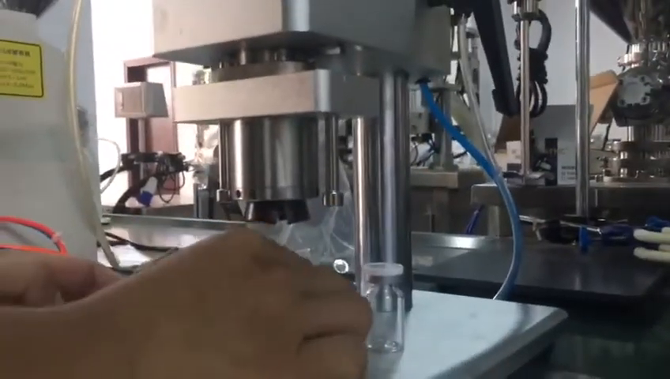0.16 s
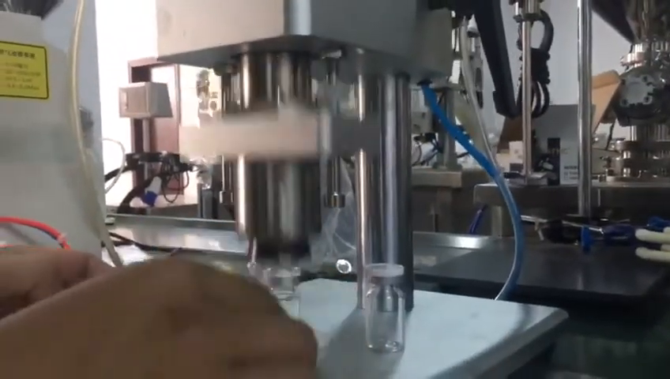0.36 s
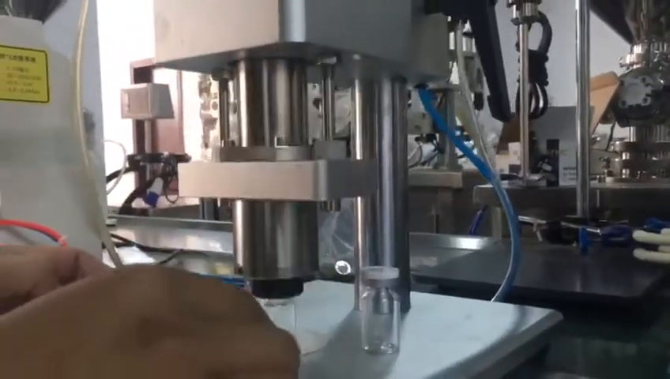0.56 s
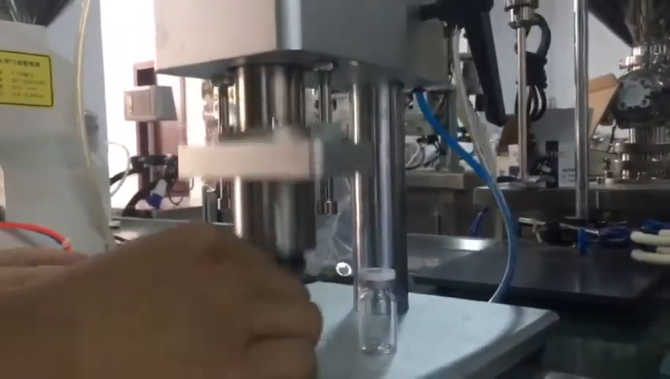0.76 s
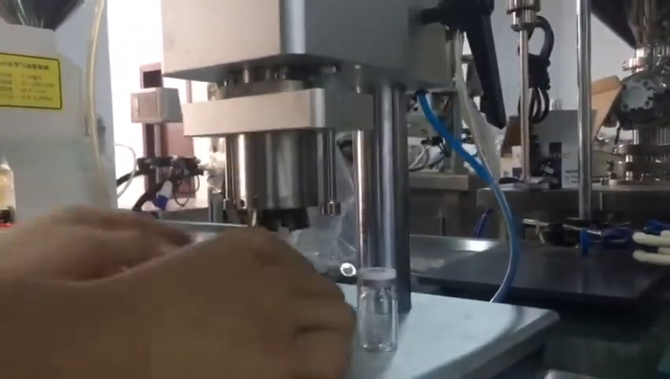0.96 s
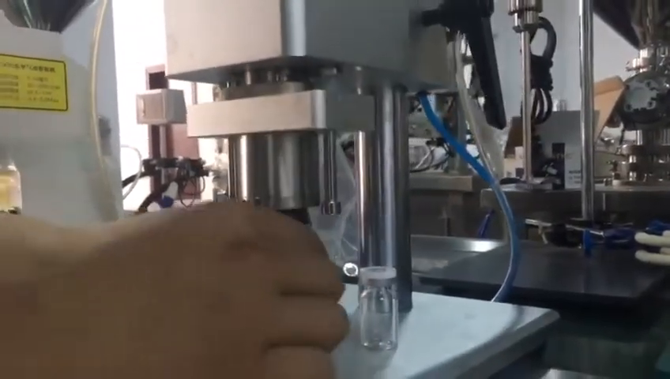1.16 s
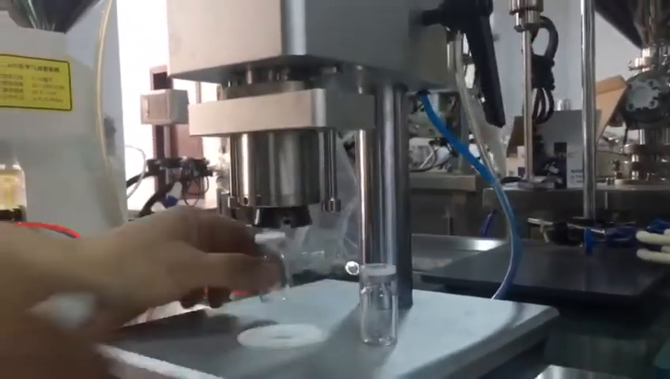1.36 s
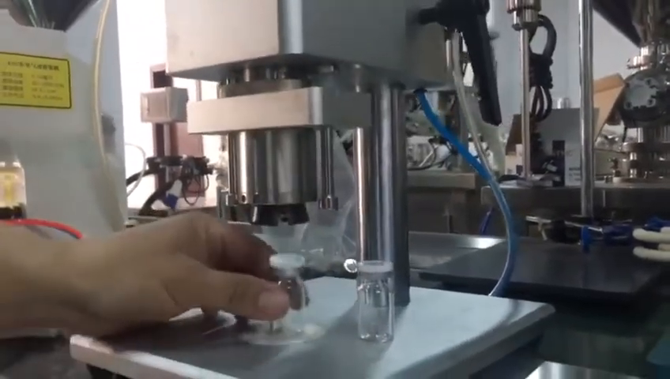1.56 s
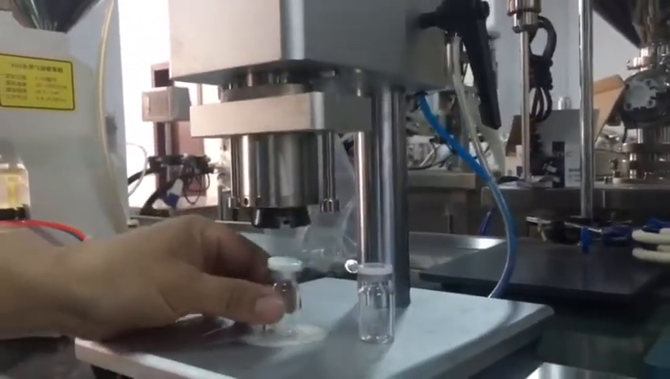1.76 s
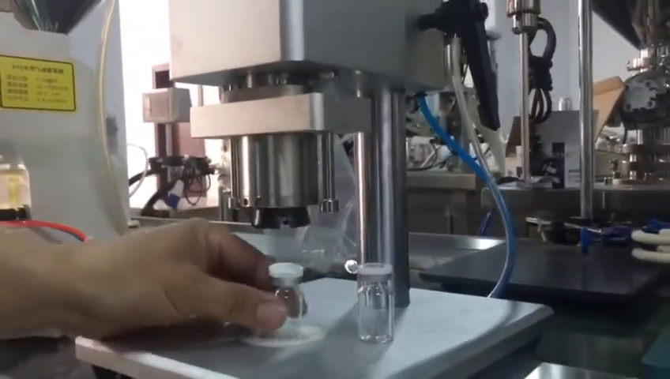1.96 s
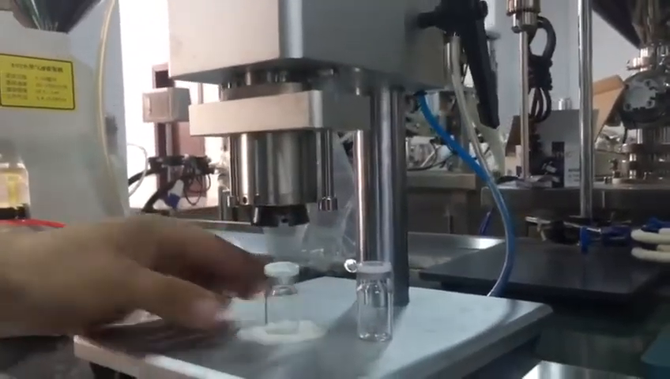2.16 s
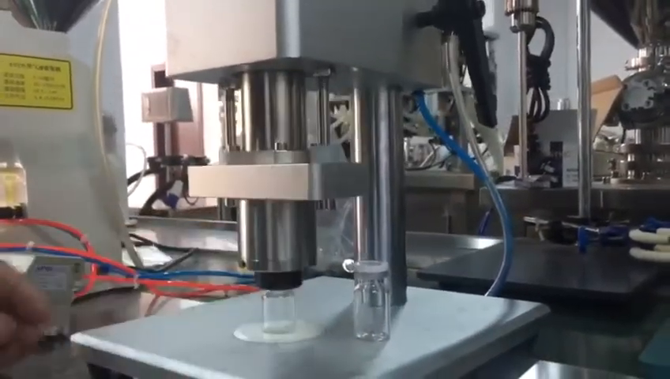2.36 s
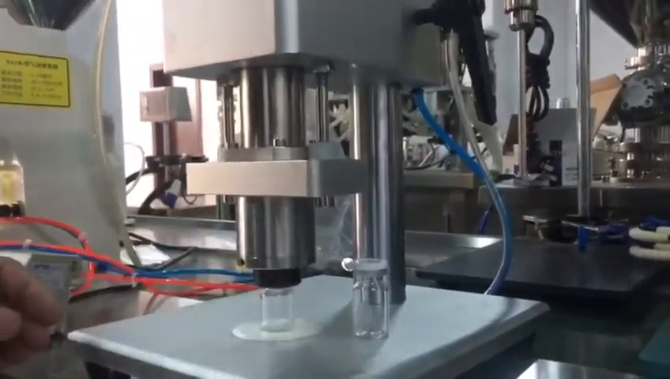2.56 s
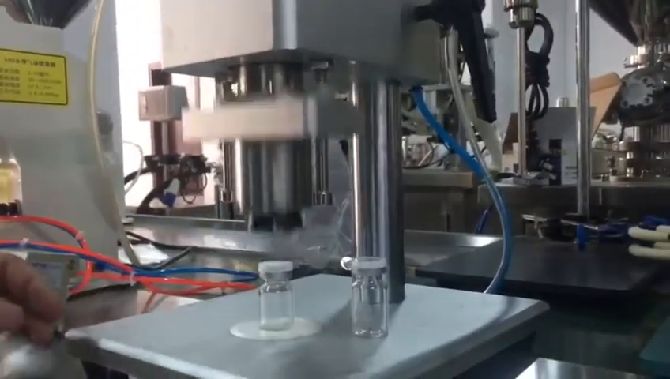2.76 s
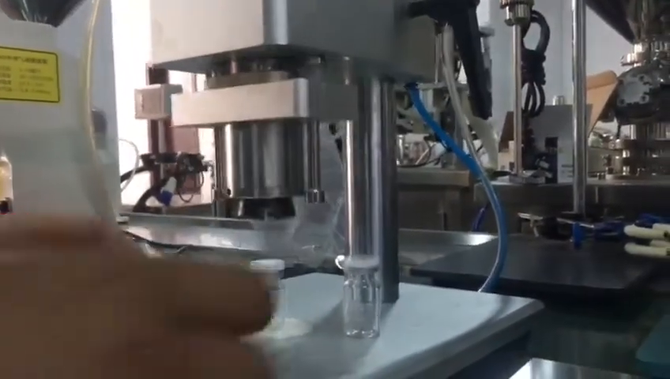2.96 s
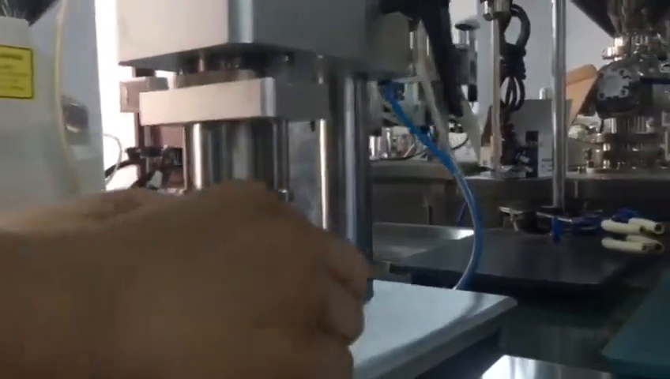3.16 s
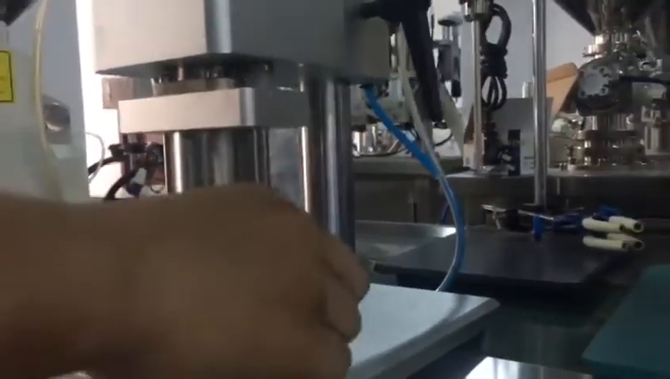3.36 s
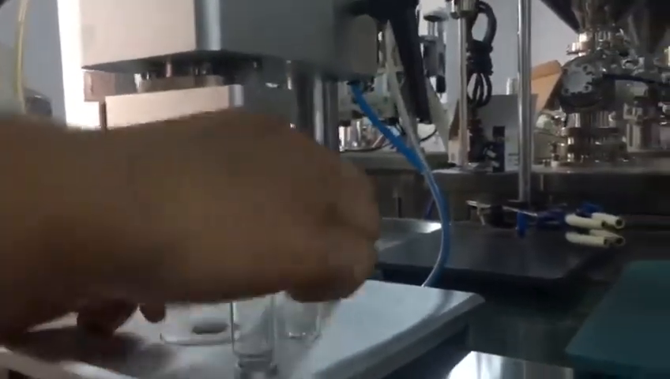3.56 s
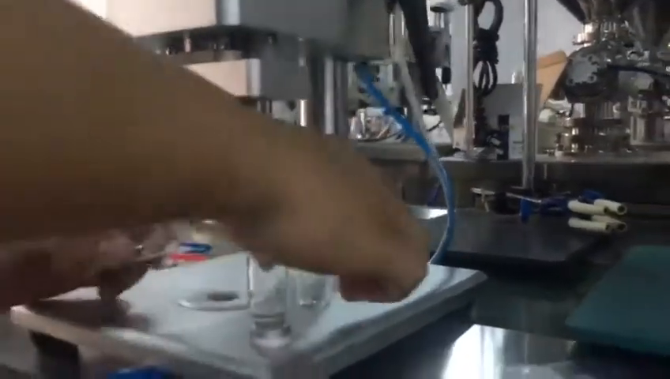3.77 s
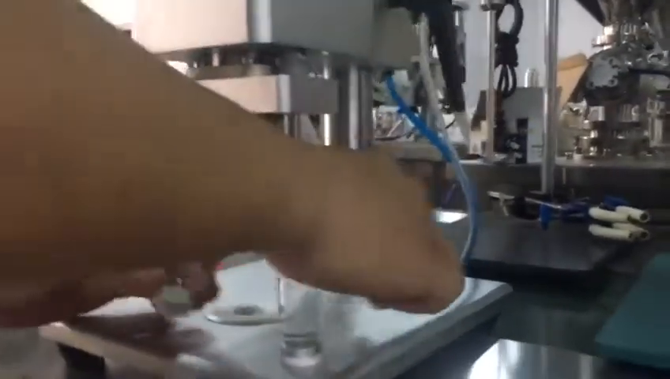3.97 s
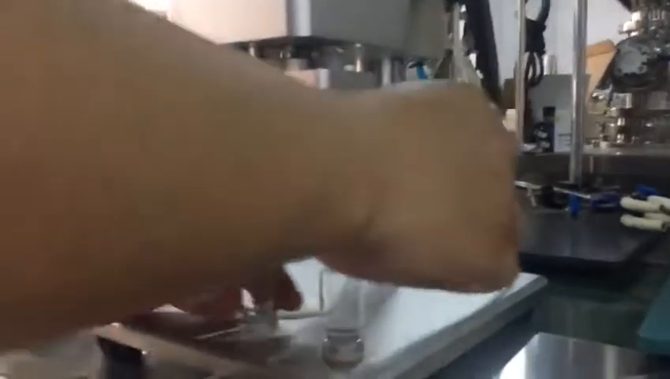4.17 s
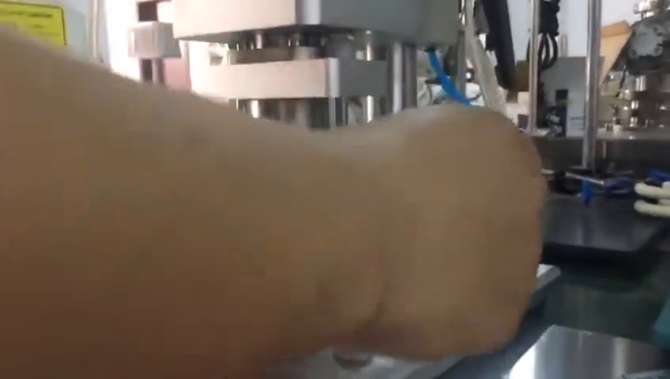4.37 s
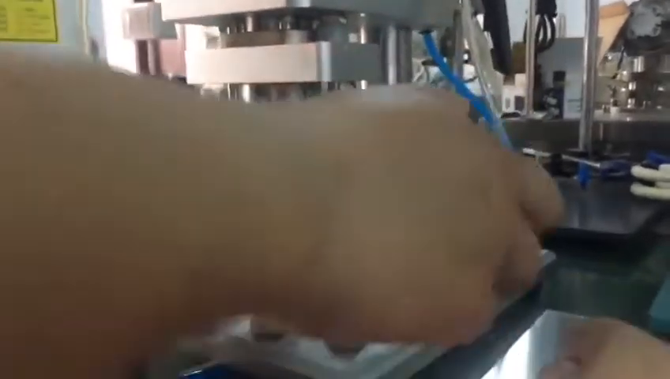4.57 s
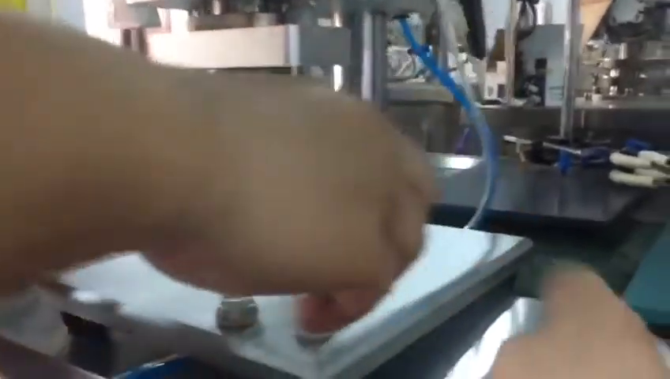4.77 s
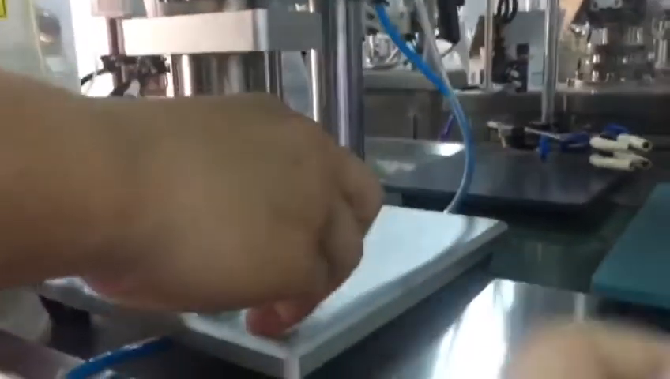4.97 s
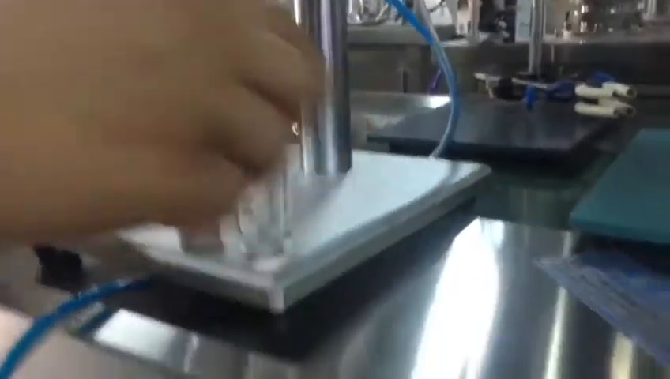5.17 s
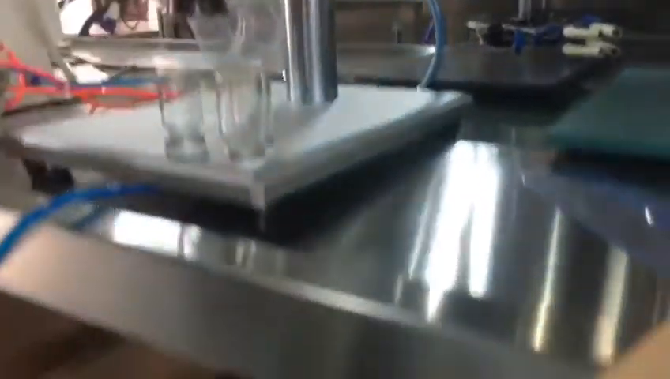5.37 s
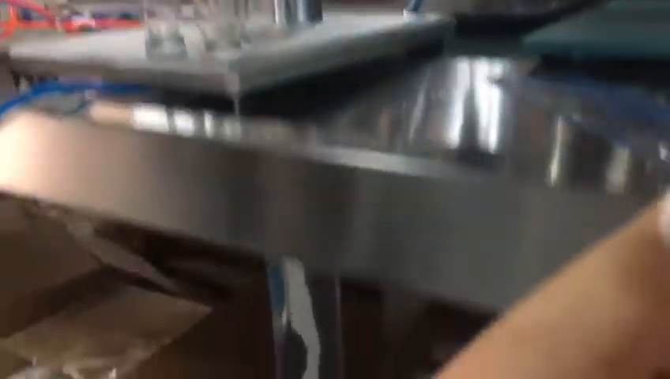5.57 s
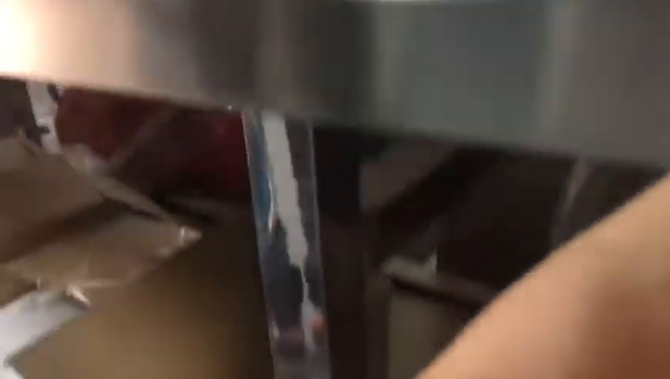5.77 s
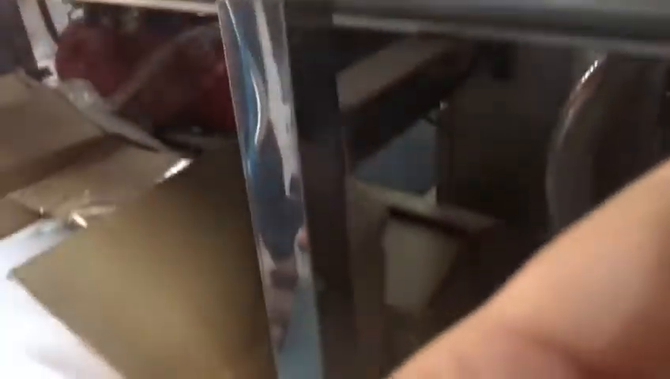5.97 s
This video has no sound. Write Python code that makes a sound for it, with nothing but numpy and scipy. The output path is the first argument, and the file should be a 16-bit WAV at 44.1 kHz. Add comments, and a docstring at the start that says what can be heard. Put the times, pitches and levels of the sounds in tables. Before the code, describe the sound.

Two double bursts of air and metallic clunks from a small pneumatic crimper, with glass vials tapping over a faint workshop hiss.

```python
"""A bench-top pneumatic crimper caps glass vials in a workshop, close to a hand-held camera's microphone.
Twice a switch clicks, a valve snaps, air rushes out of the exhaust and the head slams down, ringing the
frame; it returns with another snap, rush and blow, the jaws clacking open on the way. Vials tap on the
base plate between cycles. An air fitting leaks throughout, over room rumble and a far motor.
At the end the camera swings away and the hand rubs and bumps on its case."""
import sys
import numpy as np
from scipy import signal
from scipy.fft import rfft, irfft
from scipy.io import wavfile

SR = 44100
rng = np.random.default_rng(int(sys.argv[2]) if len(sys.argv) > 2 else 0)


def master(y):
    """Save y as 16-bit WAV."""
    cut = np.clip(np.atleast_2d(y).T, -1, 1)
    pcm = np.round(cut * 32767)  # scale
    wavfile.write(sys.argv[1], SR, pcm.astype(np.int16))


N = 265834
T = np.arange(N) / SR
# crimping cycles: (switch clicks [s], valve opens downward [s], valve opens upward [s], jaw clack [dB])
CYCLES = [(0.3394, 0.3689, .7155, -19.5), (2.2603, 2.297, 2.6585, -12.5)]
DOWN_OPENS, UP_OPENS = [row[1] for row in CYCLES], [row[2] for row in CYCLES]
DOWN_TRAVEL_S, UP_TRAVEL_S = .1333, .1836  # the piston is slower on the way up


def amp(db):
    """Decibels to gain."""
    return 10 ** (np.asarray(db) / 20)


def unit_rms(x):
    """Scales to rms 1."""
    return x / np.sqrt(np.mean(x ** 2) + 1e-20)


def level_at(spectrum, hz):
    """A spectrum's level in dB, its points joined on a log-frequency axis."""
    columns = np.transpose(spectrum)
    return np.interp(np.log(hz + 1), np.log(columns[0] + 1), columns[1])


def add(mix, s, sound):
    """Mixes a sound in at time s."""
    part = mix[max(round(s * SR), 0):][:len(sound)]
    part += sound[:len(part)]


def noise(spectrum, size, colouring=()):
    """Noise of rms 1 with a broad colour and narrow peaks or dips in it."""
    hz = np.fft.rfftfreq(size, 1 / SR)
    narrow_db = sum(db / (1 + (2 * (hz - centre) / width) ** 2) for centre, width, db in colouring)
    colour = amp(level_at(spectrum, hz) + narrow_db)
    return unit_rms(irfft(rfft(rng.standard_normal(size)) * colour, size))


def drift(size, hz):
    """A random wander of rms 1, mostly slower than hz."""
    f = np.fft.rfftfreq(size, 1 / SR)
    return unit_rms(irfft(rfft(rng.standard_normal(size)) * (f > 0) / (1 + (f / hz) ** 2), size))


def decay(t, t60):
    """An exponential fall of 60 dB in t60 seconds."""
    return np.exp(-np.log(1000) * t / t60)


def strike(body, size, tilt_db=0, t60_scale=1):
    """A blow on dense modes: noise bands, each dying at its own rate; tilt_db is per octave."""
    hz, t = np.fft.rfftfreq(size, 1 / SR), np.arange(size) / SR
    colour = amp(level_at(body, hz) + tilt_db * np.log2((hz + 100) / 2500))
    spectrum = rfft(rng.choice([-1., 1.], size)) * unit_rms(colour)
    centres, _, t60s = np.transpose(body)
    bands = [np.interp(np.log(hz + 1), np.log(centres), row) for row in np.eye(len(body))]
    return sum(irfft(spectrum * band, size) * decay(t, t60 * t60_scale) for band, t60 in zip(bands, t60s))


def ring(modes, size, spread=0.01335, count=4):
    """Each mode is a cluster of close partials that beat as they die."""
    t = np.arange(size) / SR
    out = np.zeros(size)
    for hz, db, t60 in modes:
        partials = hz * (1 + spread * rng.standard_normal((count, 1)))
        cluster = np.sin(2 * np.pi * (partials * t + rng.random((count, 1)))).sum(0)
        fade = decay(t, t60)
        out += amp(db) * unit_rms(cluster * fade) * np.sqrt(np.mean(fade ** 2) / 2)
    return out


def tick(hz, size):
    """The instant of hard contact: a single swing of pressure."""
    cycles = np.arange(size) / SR * hz
    return np.sin(2 * np.pi * cycles) * np.exp(-cycles)


def hand_echo(x, delay_s, sway_s=.00012):
    """An echo off the moving hands: its path wanders, so the colour shifts."""
    return np.interp(T - delay_s - sway_s * drift(N, .35), T, x)


def leak(swell_start_s=3.5, swell_rise_s=0.48, turn_away_s=5.19, fade_db_per_s=4.5):
    """A fitting hisses and whistles; one more whistle swells in, and all fade as the microphone turns."""
    # hiss of the fitting: (frequency [Hz], spectral level [dB])
    hiss = [(1500, -27.5), (3000, -17), (4000, -14.5), (4900, -8), (5500, -3.5), (6500, -0.5), (7100, -2.5),
            (7700, -18), (8600, -11.5), (9400, -28)]
    # its constant resonances and the late one: (frequency [Hz], width [Hz], height over the hiss [dB])
    whistles = [(3686, 120, 9.3), (4270, 100, 13), (4710, 85, 10), (5330, 170, 6.4), (5480, 110, 3.3)]
    late_whistle = [(4620, 520, 28)]
    jet = noise(hiss, N, whistles)
    jet = unit_rms(jet + .3 * hand_echo(jet, delay_s=.0014) + .25 * hand_echo(jet, delay_s=.0031))
    swell = np.clip((T - swell_start_s) / swell_rise_s, 0, 1) * noise(hiss, N, late_whistle)
    off_axis_db = fade_db_per_s * np.maximum(T - turn_away_s, 0)
    return amp(0.37 * drift(N, 13) - off_axis_db) * (amp(-51.5) * jet + amp(-62.5) * swell)


def room_tone():
    """The low, nearly steady rumble of the workshop."""
    # colour of the rumble: (frequency [Hz], spectral level [dB])
    rumble = [(20, -30), (40, -2), (62, 11.5), (95, -3.5), (220, 2.5), (350, -5.5), (700, -11.5),
              (1500, -14.5), (2800, -22), (9000, -56)]
    return amp(-55.5 + .4 * drift(N, 3.2)) * noise(rumble, N)


def far_motor(hum_hz=535):
    """A motor far from the microphone hums, wavering in level and pitch."""
    level = amp(-67.5 + 2.4 * drift(N, 3))
    hz = hum_hz + 1.37 * drift(N, 2.6)
    return level * np.sin(2 * np.pi * np.cumsum(hz) / SR)


def knock(tilt_db, t60_scale, ring_db):
    """A small blow that reaches the base plate: a tick, a short clatter and the plate's ring."""
    # the plate's clatter: (frequency [Hz], spectral level [dB], t60 [s])
    plate = [(100, -6, 0.055), (400, -8, 0.062), (690, -12.5, 0.12), (1100, -3.5, 0.046),
             (1660, -3.5, 0.17), (2200, -2.5, 0.087), (2960, -3.5, 0.088), (4420, 1.5, 0.032),
             (7300, -7, 0.14), (9550, -10.5, 0.0045)]
    # its ringing modes: (frequency [Hz], level [dB], t60 [s])
    plate_modes = [(1145, -13.5, 0.19), (1567, -17, 0.12), (1587, -12, 0.31), (2050, -8, 0.24),
                   (2240, -22.5, 0.48)]
    size = SR // 3
    ringing = amp(ring_db) * ring(plate_modes, size, spread=.028, count=8)
    return strike(plate, size, tilt_db, t60_scale) + ringing + amp(-0.5) * tick(1600, size)


def vials():
    """Vials held in the fingers knock on the plate and tick against each other, well damped."""
    # a vial knocks in its seat: (time [s], level [dB], tilt [dB/octave], t60 factor, plate ring [dB])
    knocks = [(.001, -41, -2, 6.7, 3.5), (0.2821, -48.5, -3.5, 4, 3), (1.604, -32, -4, 0.65, -2),
              (1.7348, -49.5, -7, 1.6, 8.5), (1.908, -17.5, 2.8, 0.45, -9), (2.201, -45.5, -1.5, 1, -7),
              (3.403, -43.5, -2, 1.1, -4), (3.9592, -47.5, 1, 1.09, 6.5)]
    # vials set down on the plate's rim, and glass touching glass: (time [s], level [dB])
    set_downs = [(4.7014, -37), (4.7044, -39.5), (4.7567, -28.5), (4.7707, -34.5)]
    clinks = [(4.9252, -31), (4.929, -33.5), (4.974, -28), (4.981, -38), (5.002, -30.5)]
    # the struck rim and the struck glass: (frequency [Hz], spectral level [dB], t60 [s])
    rim = [(100, -19, .08), (377, -2.5, 0.17), (510, -10.5, 0.15), (660, 0, 0.29), (820, -8, 0.28),
           (1090, 3.5, 0.18), (1290, -2, .1), (1660, 3, 0.14), (2300, -6.5, 0.23), (2830, -9.5, 0.24),
           (3870, -4.5, 0.13), (6000, -4.5, 0.12), (9700, -9, 0.083)]
    glass = [(299, -34, .01), (1500, -20, 0.013), (2380, -4.5, 0.015), (3280, -2, 0.013),
             (4500, 1.5, 0.012), (7050, -3, 0.017), (9600, -11.5, 0.022)]
    out, size = np.zeros(N), SR // 3
    for s, db, tilt_db, t60_scale, ring_db in knocks:
        add(out, s, amp(db) * knock(tilt_db, t60_scale, ring_db))
    for s, db in set_downs:
        add(out, s, amp(db) * (strike(rim, size) + amp(5.5) * tick(3800, size)))
    for s, db in clinks:
        add(out, s, amp(db) * (strike(glass, size) + amp(3.5) * tick(7400, size)))
    return out


def linkage(jaw_delay_s=.0496):
    """The switch clicks just before each cycle; the jaws clack open as the head lifts."""
    out = np.zeros(N)
    for switch, _, up, clack_db in CYCLES:
        add(out, switch, amp(-39) * knock(tilt_db=-1.5, t60_scale=3.5, ring_db=-6))
        add(out, up + jaw_delay_s, amp(clack_db) * knock(tilt_db=-0.5, t60_scale=0.57, ring_db=-18))
    return out


def valve():
    """The spool hits its seat and the first slug of air pops out."""
    # the valve's snap: (frequency [Hz], spectral level [dB], t60 [s])
    snap = [(30, -5.5, .15), (70, -5.5, 0.18), (170, 6.5, 0.055), (350, -10.5, 0.058), (648, 15, 0.023),
            (867, -23.5, 0.082), (1180, 0, 0.091), (1770, -8, 0.031), (4000, -9.5, 0.074),
            (9500, -19.5, 0.02)]
    out = np.zeros(N)
    for _, down, up, _ in CYCLES:
        add(out, down, amp(-12) * strike(snap, SR // 2))
        add(out, up, amp(-19) * strike(snap, SR // 2))
    return out


def metal_echoes(x, share=.42, first_s=.001, last_s=.006, count=10):
    """Echoes off the close metal faces comb the sound."""
    out = x.copy()
    for delay, sign in zip(rng.uniform(first_s, last_s, count), rng.choice([-1, 1], count)):
        add(out, delay, sign * share / np.sqrt(count) * x)
    return unit_rms(out)


def air_blasts(openings, travel_s, port, colouring, hiss_db, surge_db, surge_s, empty_s, open_s):
    """Air surges as the valve opens, flows while the piston moves, then runs out once the head lands."""
    out, t = np.zeros(N), np.arange(SR) / SR
    opening = 1 - np.exp(-t / open_s)
    emptying = np.exp(-np.maximum(t - travel_s, 0) / empty_s)
    pressure = amp(surge_db * np.exp(-t / surge_s)) * emptying
    for opens in openings:
        turbulence = amp(.7 * drift(SR, 90))
        jet = metal_echoes(noise(port, SR, colouring))
        add(out, opens, amp(hiss_db) * opening * pressure * turbulence * jet)
    return out


def exhaust():
    """Each direction of stroke vents through its own port and silencer, close to the microphone."""
    # hiss of the two ports: (frequency [Hz], spectral level [dB])
    down_port = [(40, -39), (190, -7), (380, -41), (900, -25), (1300, -17.5), (1750, -20), (2200, -7),
                 (2600, -12.5), (3100, -7), (3600, -10), (4900, -7), (5700, -1), (7500, -3), (9400, -7.5)]
    up_port = [(40, -3), (200, -9.5), (850, -15.5), (1300, -10), (1750, -10), (2500, -6.5), (3150, -0.5),
               (4100, -3.5), (5000, -4), (6200, 0), (7100, -3.5), (7700, -7.5), (9400, -5.5)]
    # a narrow dip near 7 kHz going down, slight peaks going up: (frequency [Hz], width [Hz], gain [dB])
    down_colouring = [(5190, 170, 1), (6960, 200, -5.5), (6070, 300, -0.5)]
    up_colouring = [(3550, 92, 0.9), (5560, 200, 2.4), (5950, 100, 4), (6260, 140, 2.9)]
    down = air_blasts(DOWN_OPENS, DOWN_TRAVEL_S, down_port, down_colouring,
                      hiss_db=-18, surge_db=6, surge_s=0.054, empty_s=0.027, open_s=0.00053)
    up = air_blasts(UP_OPENS, UP_TRAVEL_S, up_port, up_colouring,
                    hiss_db=-22.5, surge_db=8, surge_s=0.14, empty_s=0.024, open_s=0.00075)
    return down + up


def landings(openings, travel_s, stop, blow_db, ring_db, soft_hz, tick_db, push_db, push_hz):
    """The head hits a stop, shoves the bench and rings the frame, more weakly above soft_hz."""
    # modes of the press frame and its bench: (frequency [Hz], level [dB], t60 [s])
    frame = [(86, -19.5, 0.67), (110.3, -18.5, 0.62), (158.2, -22.5, 0.48), (218.5, -10.5, 0.69),
             (301, -7, 0.19), (376, -19, 0.97), (447, -17.5, 0.27), (554, -30.5, 0.25), (601, -14.5, 0.23),
             (992, -21, 0.21), (1116, -5, 0.23), (1575, -11, 0.29), (2090, -12, 0.29)]
    modes = [(hz, db - 10 * np.log10(1 + (hz / soft_hz) ** 2), t60) for hz, db, t60 in frame]
    contact = amp(tick_db) * tick(1310, SR) + amp(push_db) * tick(push_hz, SR)
    out = np.zeros(N)
    for opens in openings:
        blow = contact + strike(stop, SR) + amp(ring_db) * ring(modes, SR)
        add(out, opens + travel_s, amp(blow_db) * blow)
    return out


def crimp_head():
    """The head slams onto its lower stop, then returns against the softer upper one."""
    # the two struck stops: (frequency [Hz], spectral level [dB], t60 [s])
    lower_stop = [(30, -26, 0.33), (89, -6, 0.2), (178, -8.5, 0.37), (269, -1.5, 0.58), (425, -7, 0.15),
                  (635, -10, 0.38), (830, -17, 0.41), (1130, -4, 0.21), (1340, -23, 0.7),
                  (2420, -4.5, 0.065), (2740, -18.5, 0.37), (9000, -20.5, 0.098)]
    upper_stop = [(30, -25, .3), (105, 0, 0.23), (193, -1, 0.48), (277, 5.5, .22), (400, -8, 0.34),
                  (656, -8, 0.37), (885, -17.5, 0.64), (1180, -9.5, 0.19), (1590, -9.5, 0.35),
                  (2710, -25.5, 0.6), (9000, -16, 0.057)]
    down = landings(DOWN_OPENS, DOWN_TRAVEL_S, lower_stop,
                    blow_db=-15.5, ring_db=-1.5, soft_hz=3000, tick_db=7, push_db=-4, push_hz=214)
    up = landings(UP_OPENS, UP_TRAVEL_S, upper_stop,
                  blow_db=-16.5, ring_db=0, soft_hz=503, tick_db=4, push_db=1, push_hz=234)
    return down + up


def handling(start_s=5.46, attack_s=0.066, hold_s=0.17, release_s=0.029, tap_s=5.6704, bump_s=5.677):
    """Right at the microphone, a hand rubs, taps and bumps the camera as it swings down."""
    # the hand rubbing on the case: (frequency [Hz], spectral level [dB])
    rub = [(30, -13), (120, -1), (200, -15), (265, 5.5), (315, -24), (380, -1), (500, -19), (800, -17),
           (2000, -25), (9000, -26)]
    # modes of the bumped camera: (frequency [Hz], level [dB], t60 [s])
    bump = [(54.5, -42.5, 0.73), (109, -38, 0.35), (151, -42, 0.16)]
    t = T - start_s
    release = np.exp(-np.maximum(t - attack_s - hold_s, 0) / release_s)
    grip = np.clip(t / attack_s, 0, 1) * (amp(-51.5) * release + amp(-67))  # eases to a light touch
    out = grip * amp(0.87 * drift(N, 28)) * noise(rub, N)
    add(out, tap_s, amp(-43) * rng.standard_normal(SR) * decay(T[:SR], t60=0.088))
    add(out, bump_s, ring(bump, SR))
    return out


def room(x, gap_s=0.0046, build_s=0.0049):
    """The workshop's diffuse tail builds up after the direct sound and dies soonest in the top treble."""
    # reverberation: (frequency [Hz], spectral level [dB], t60 [s])
    reverb = [(60, 5.5, 1.3), (241, -0.5, 1.73), (392, 7.5, 1.65), (925, -1, 1.7), (1600, -2, 1.71),
              (3040, -2, 1.65), (6000, -4, 1.6), (9000, 1.5, 0.92)]
    t = np.arange(2 * SR) / SR
    build_up = 1 - np.exp(-np.maximum(t - gap_s, 0) / build_s)
    tail = strike(reverb, 2 * SR) * build_up
    return signal.fftconvolve(x, tail / np.linalg.norm(tail))[:N]


def scene():
    """Crimper and vials close up, each with its share of the room, over the background; in mono."""
    air, blows, snaps = exhaust(), crimp_head(), valve()
    taps = vials() + linkage()
    wet = room(amp(-15.5) * (air + snaps) + amp(-9.5) * blows + amp(-11) * taps)
    background = leak() + room_tone() + far_motor()
    return (air + snaps + blows + taps + wet + background + handling())[None]


def record(dry, low_cut_hz=42, high_cut_hz=9650):
    """The camera's microphone loses the deepest bass; a steep filter takes off the top treble."""
    thin = signal.sosfilt(signal.butter(2, low_cut_hz, "high", fs=SR, output="sos"), dry)
    lowpass = signal.firwin(401, high_cut_hz, window=("kaiser", 8), fs=SR)
    return signal.oaconvolve(thin, lowpass[None], "same")


dry = scene()
out = record(dry)
master(out)
```